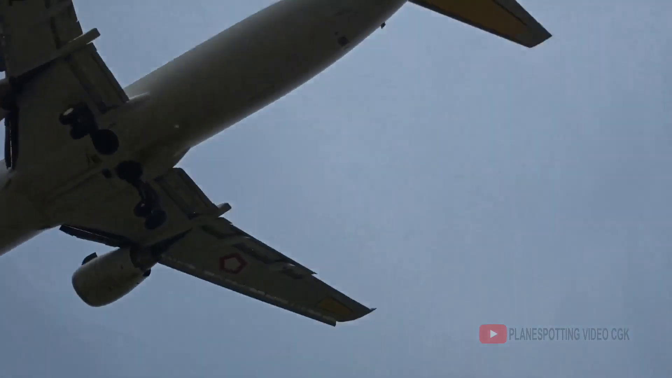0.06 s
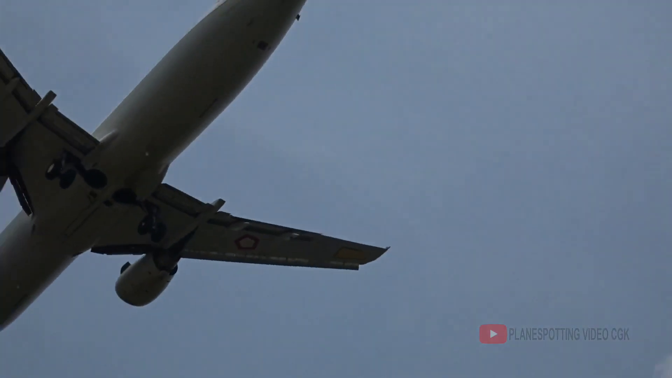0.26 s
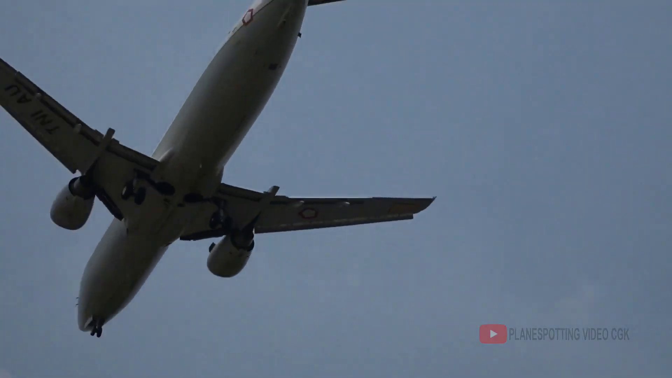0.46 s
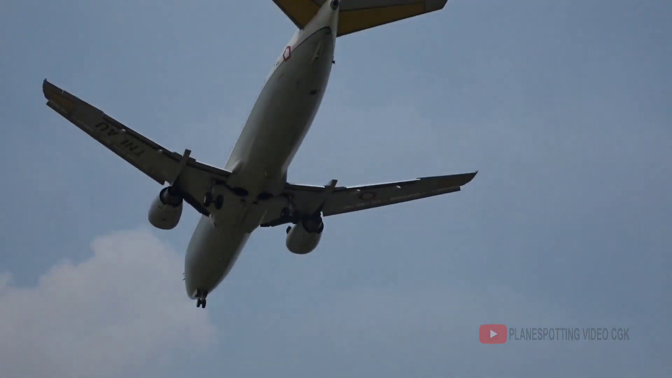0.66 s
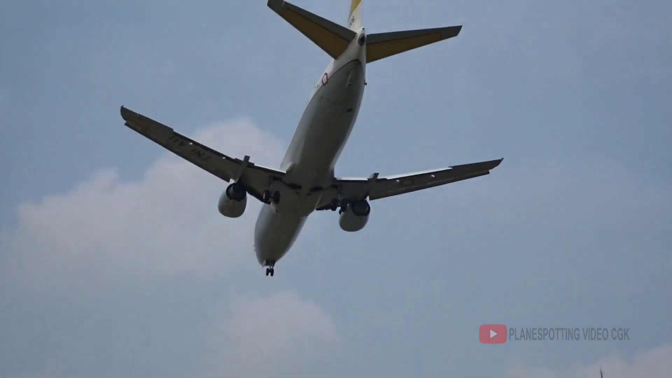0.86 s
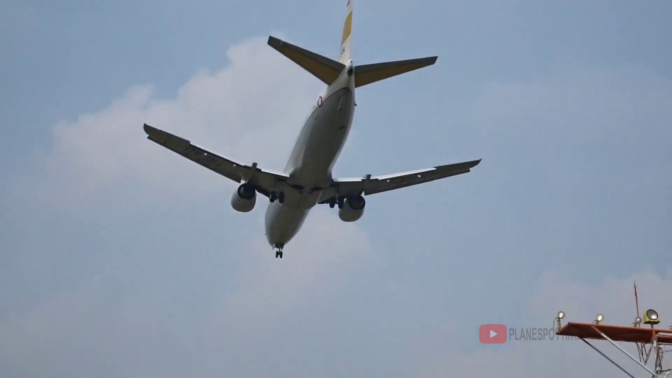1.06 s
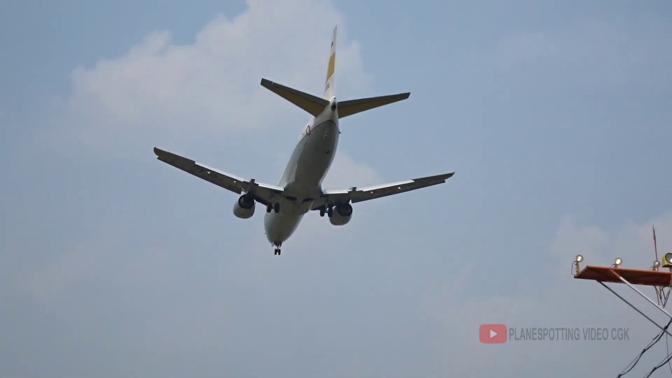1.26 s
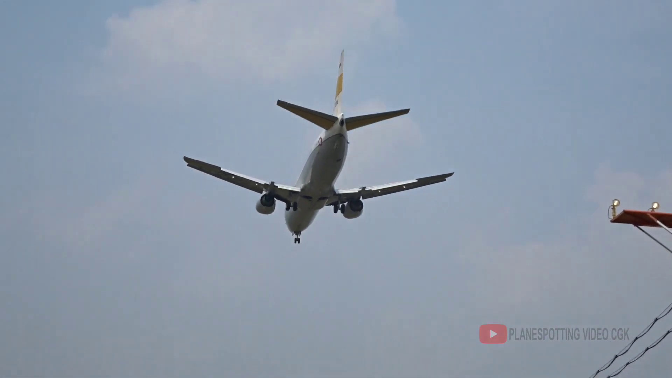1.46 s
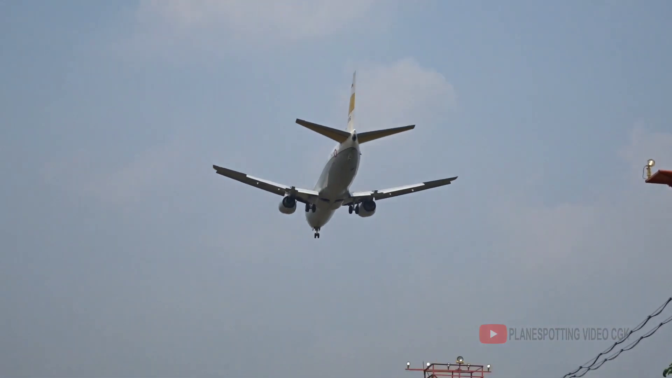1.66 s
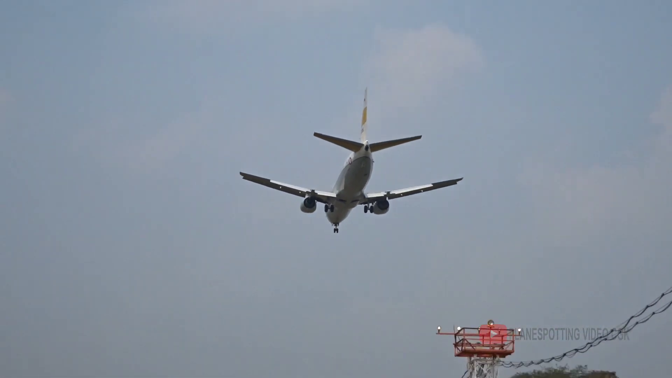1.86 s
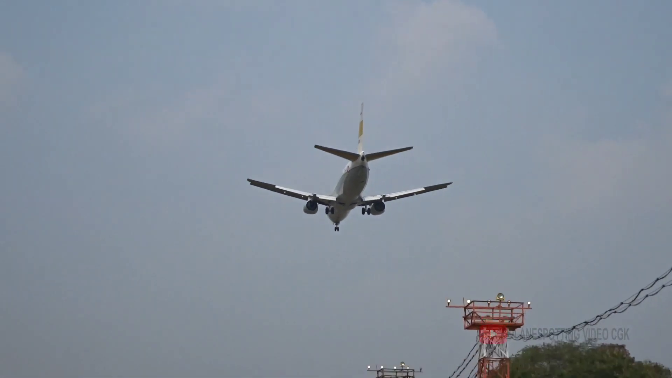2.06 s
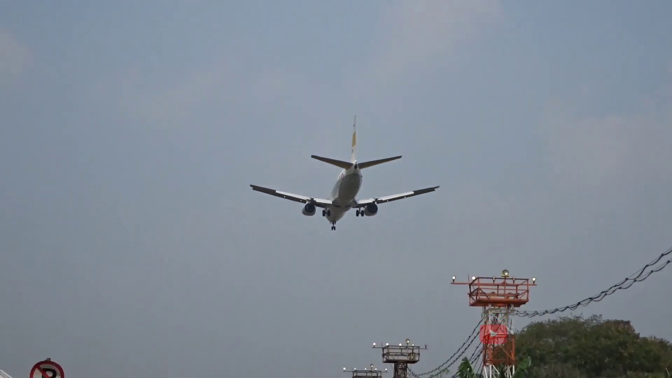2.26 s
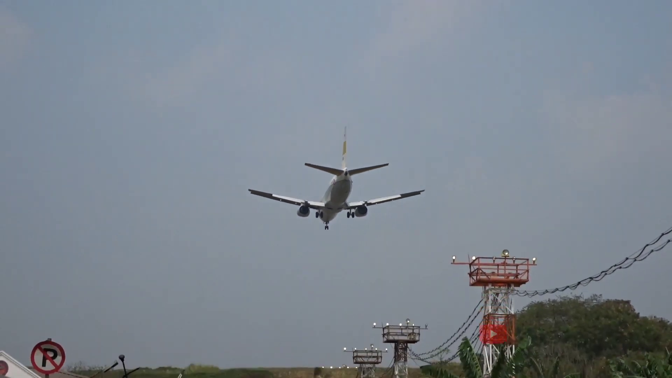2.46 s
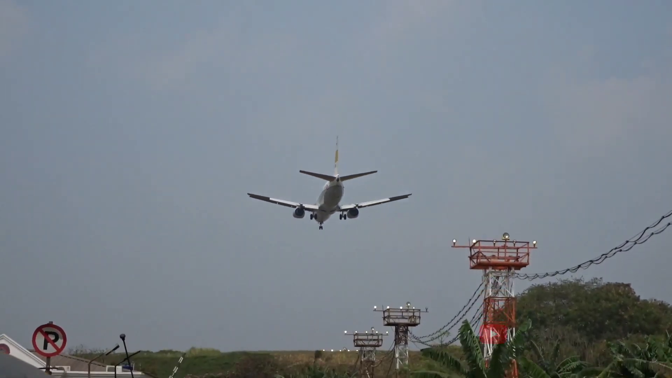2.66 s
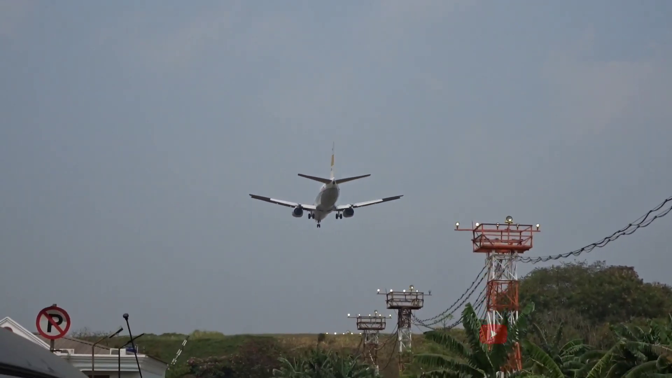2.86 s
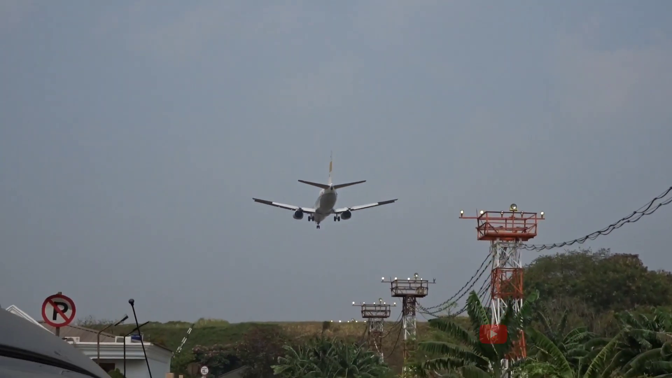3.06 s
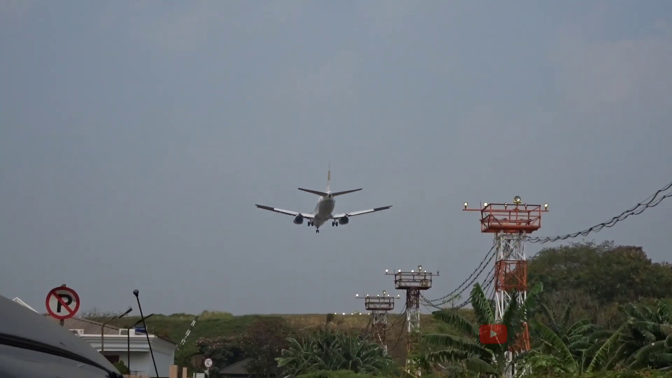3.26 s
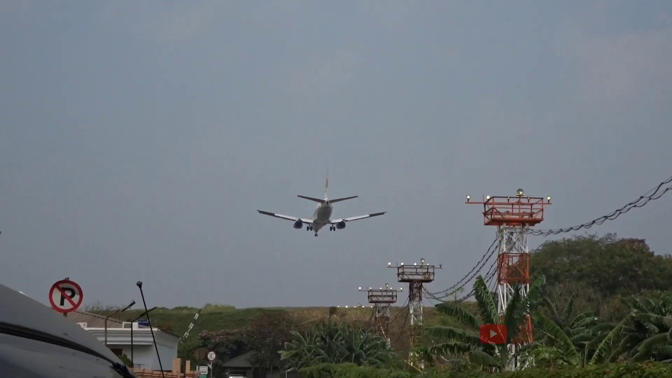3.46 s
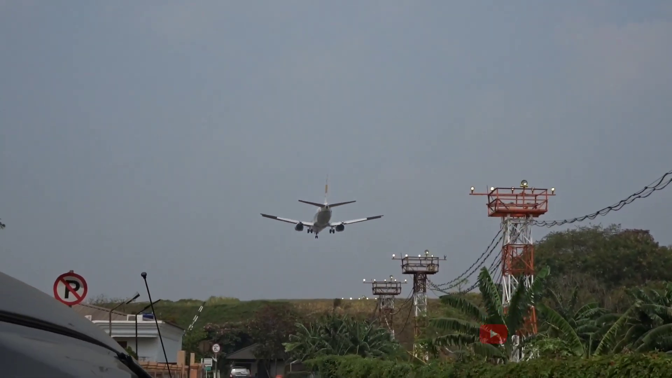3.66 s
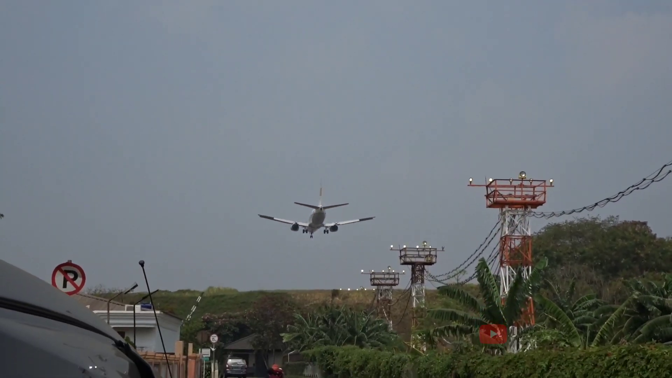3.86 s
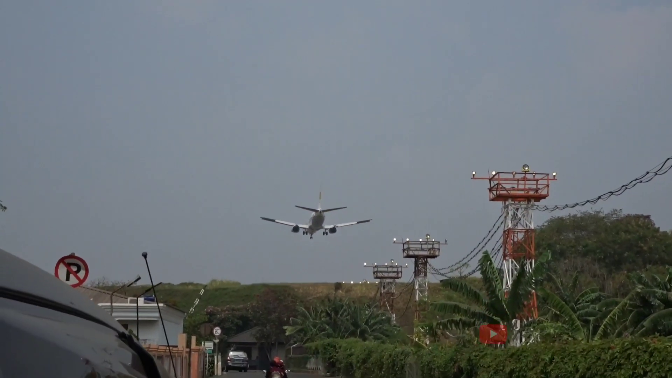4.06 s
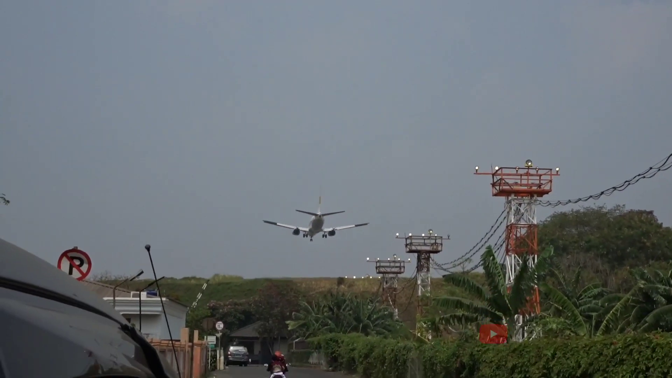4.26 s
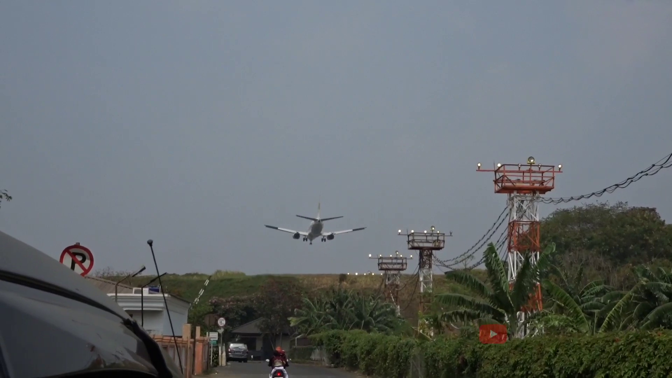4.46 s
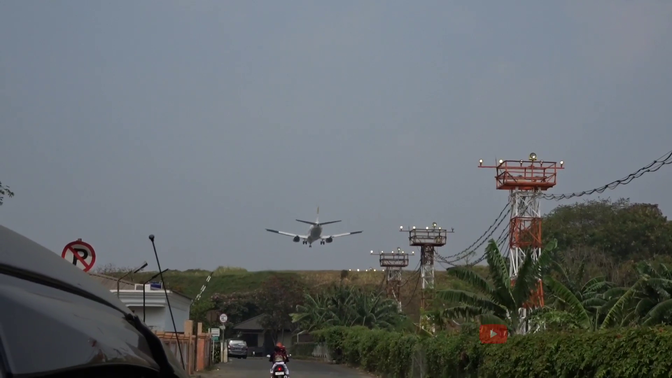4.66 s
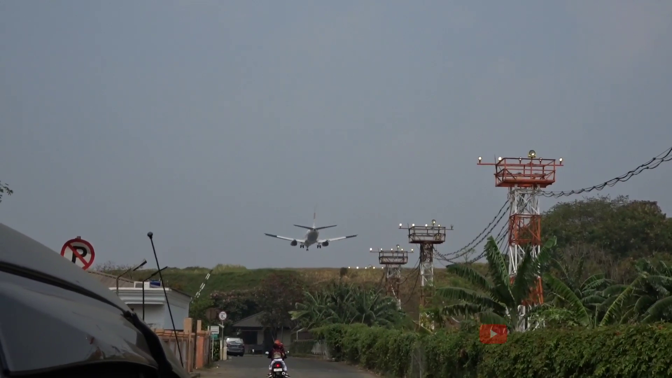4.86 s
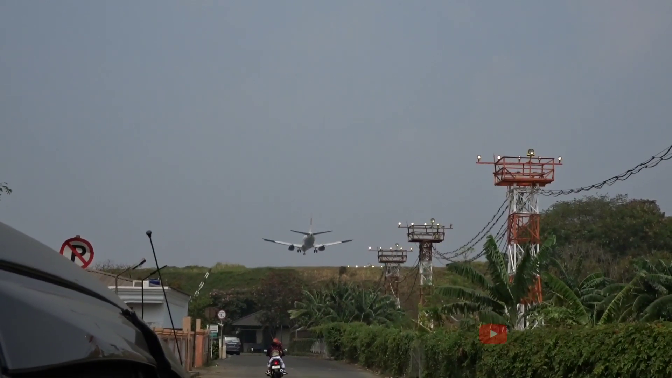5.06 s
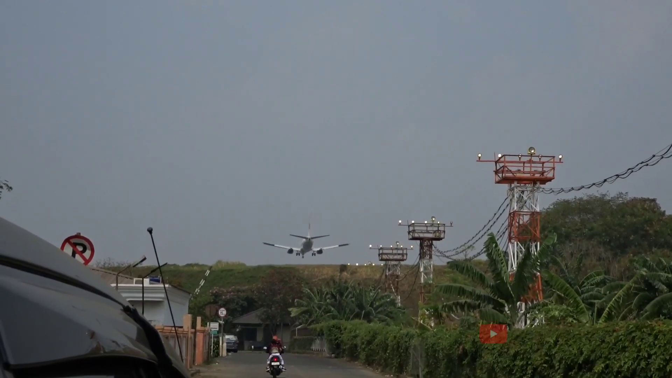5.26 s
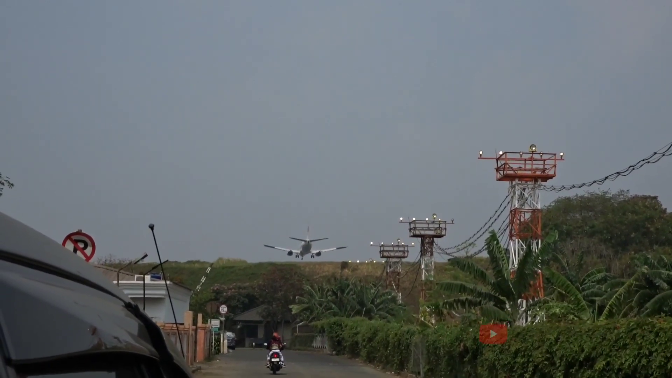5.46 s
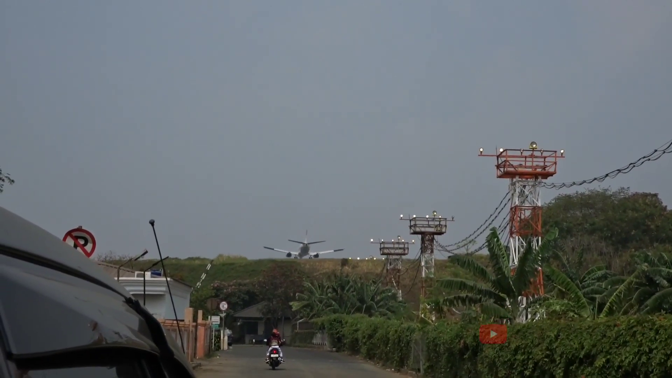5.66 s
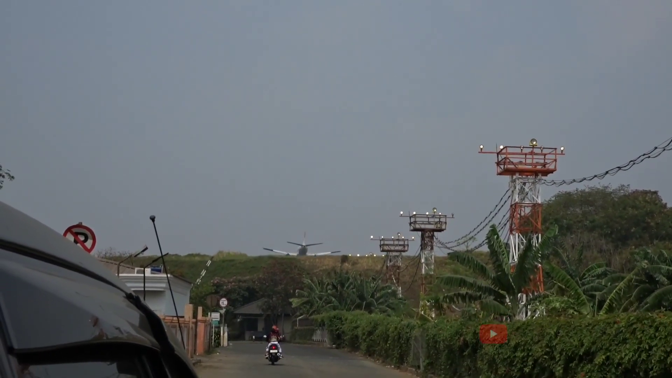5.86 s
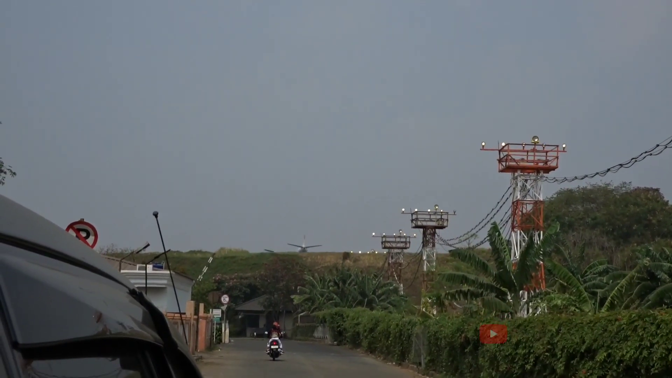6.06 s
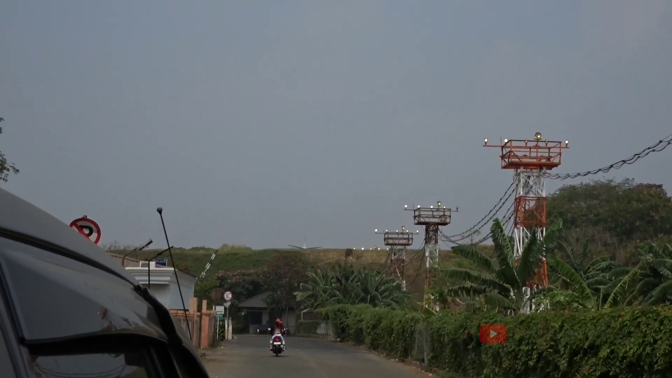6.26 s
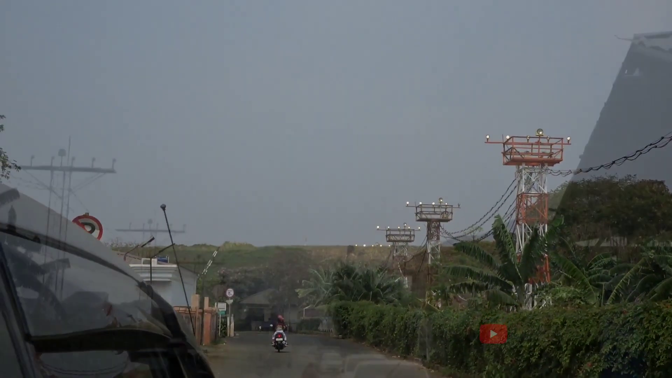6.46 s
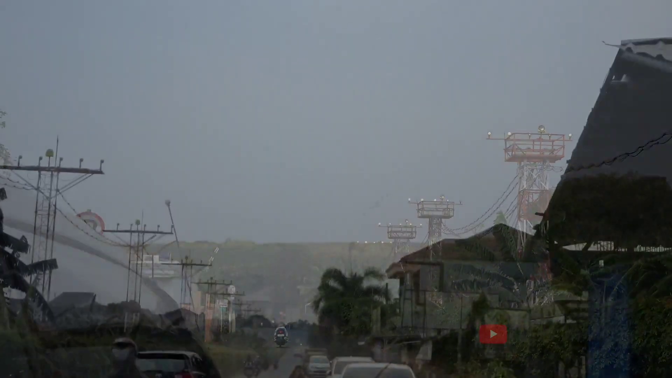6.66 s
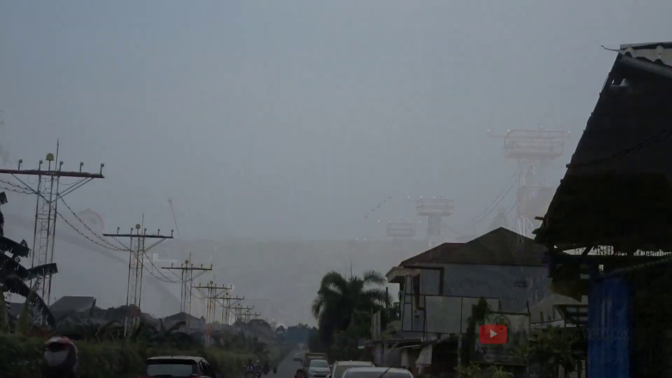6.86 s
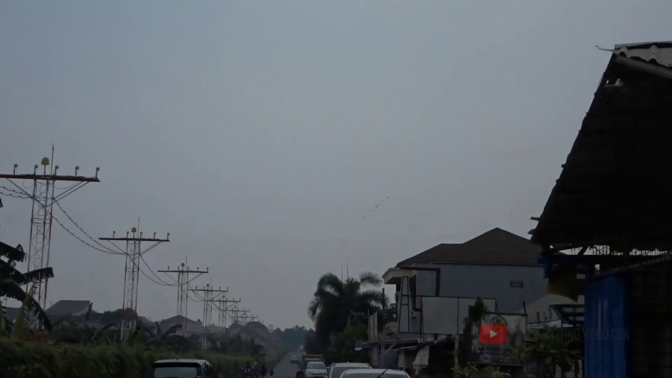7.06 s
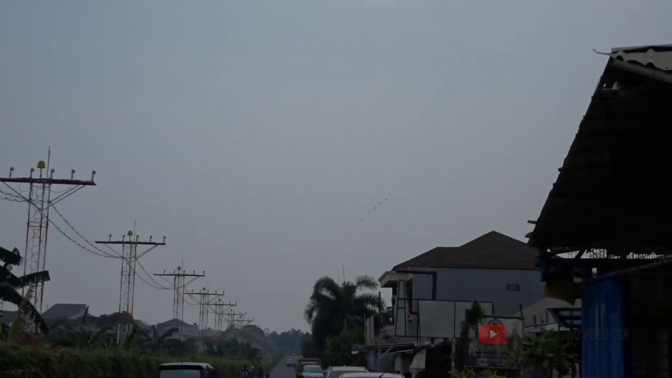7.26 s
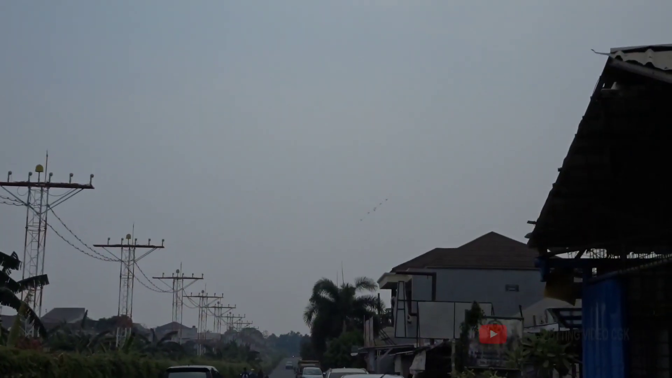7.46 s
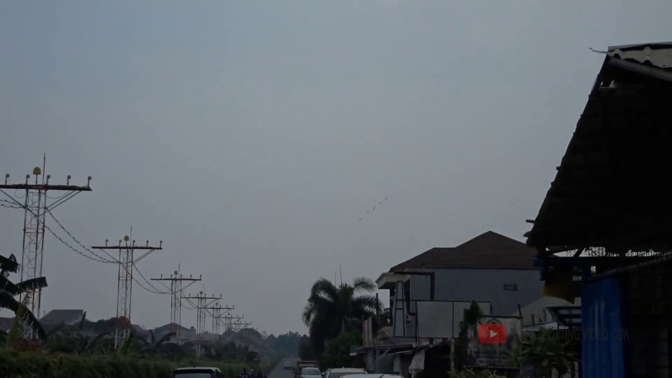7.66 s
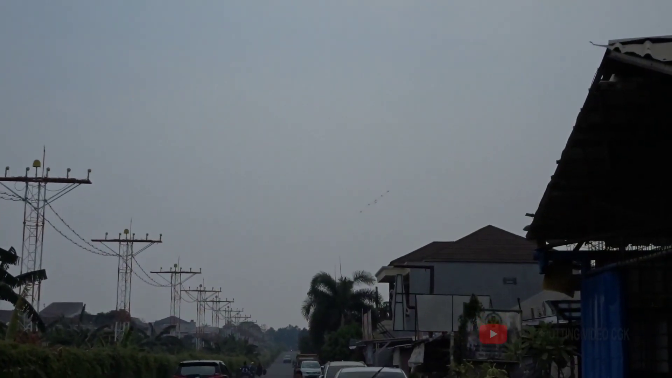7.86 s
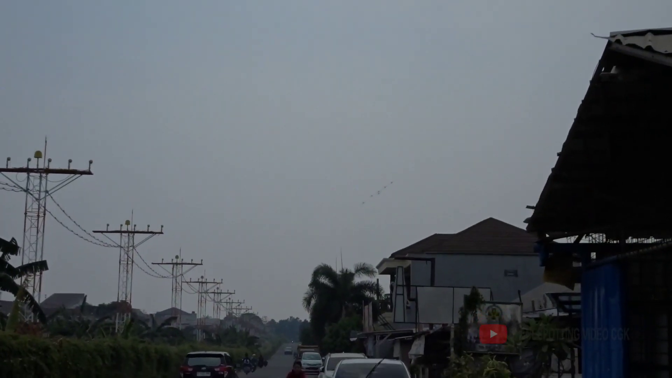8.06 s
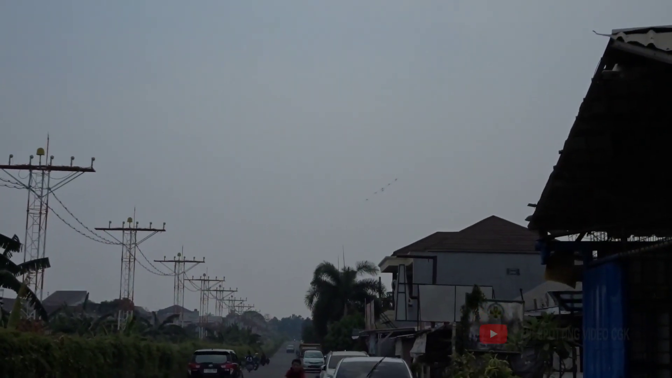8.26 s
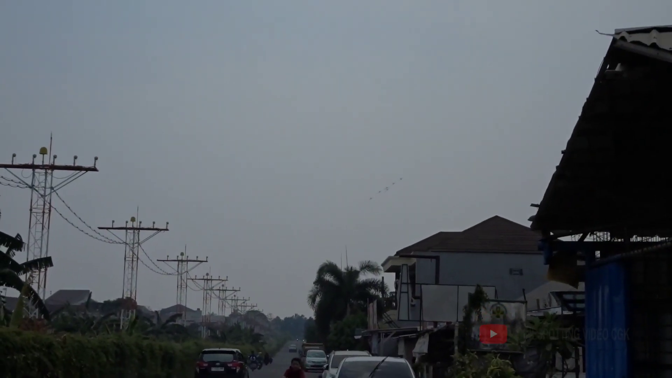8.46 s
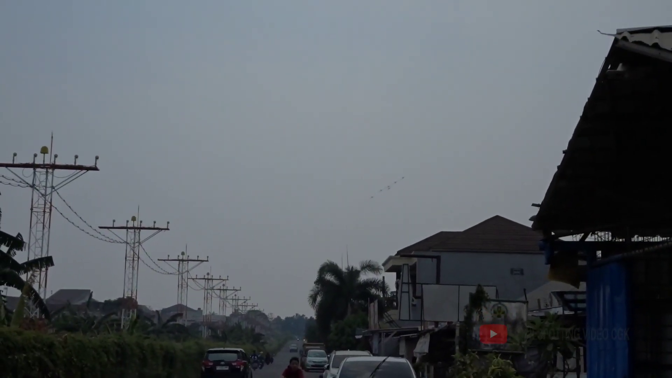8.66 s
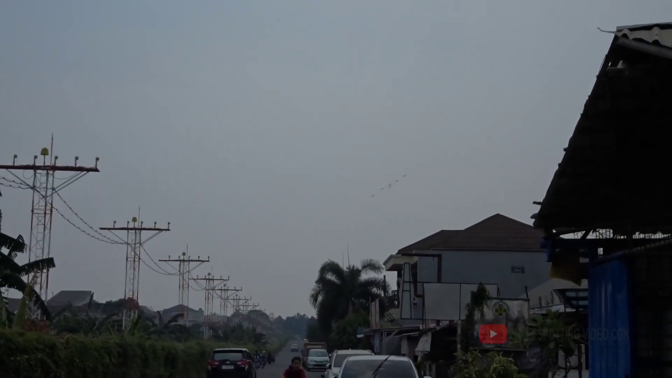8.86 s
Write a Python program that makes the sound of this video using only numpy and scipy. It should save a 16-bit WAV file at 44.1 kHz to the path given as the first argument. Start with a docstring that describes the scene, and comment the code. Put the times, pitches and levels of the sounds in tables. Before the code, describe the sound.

Outdoors by a road near a runway, a landing jet is already almost overhead: loud hissing roar and high blade whistles sliding down. A wavering engine whine near one kilohertz trails behind and fades over six seconds. Quiet street noise remains, with thin ticks; then a motorbike rushes past close to the stereo microphone and putters off, with two dry clicks near the end.

```python
"""Over steady street noise a jet airliner passes low overhead: filtered noise roars, dulled by distance,
and blade tones slide down in a turbulent skirt; a Doppler-shifted whine settles near 1 kHz, swelling and fading.
Thin ticks of bright noise follow. A motorbike rushes past, wheel after wheel, as comb-filtered tyre noise, with
grit and rough whirs, then putters away on exhaust puffs and engine orders; two sharp falling-pitch clicks
sound late. Low hums and buffets of air come and go."""
import sys
import numpy as np
from scipy import signal
from scipy.fft import rfft, irfft, next_fast_len
from scipy.io import wavfile
from scipy.ndimage import map_coordinates

SR = 44100
rng = np.random.default_rng(int(sys.argv[2]) if len(sys.argv) > 2 else 0)


def pcm_store(signal):
    """Save signal as 16-bit PCM."""
    levels = np.round(np.clip(np.atleast_2d(signal), -1, 1) * 32767)
    wavfile.write(sys.argv[1], SR, levels.astype(np.int16).T)


N = 393813
TIME = np.arange(N) / SR

# airliner: moment overhead, height over speed, speed over the speed of sound
OVERHEAD_S, HEIGHT_S, MACH = 0.2, 0.72, 0.19
# motorbike and its tailpipe: moment nearest, distance over speed
PASS_S, PASS_WIDTH_S = 7.57, 0.18
TAILPIPE_S, TAILPIPE_WIDTH_S = 7.78, 0.25

# Left-right likeness of airliner and street noise. Each row: frequency in Hz, correlation.
JET_LIKENESS = [(60, 0.93), (140, 1), (350, 0.97), (830, 0.98), (1990, 0.84), (4770, 0.74), (11400, 0.43)]
# Left-right likeness of motorbike noise. Each row: frequency in Hz, correlation.
BIKE_LIKENESS = [(100, 0.99), (600, 1), (1200, 0.85), (2000, 0.3), (3500, 0.31), (6000, 0.33), (11000, .15)]
# The engine slows once the bike is past. Each row: time in seconds, firings per second.
FIRING_RATE = [(6.6, 41.5), (7.3, 42.4), (7.55, 41), (8.15, 37.8), (8.93, 34.7)]


def amp(db):
    """Decibels to gain."""
    return 10 ** (np.asarray(db) / 20)


def unit(x):
    """Scale to rms 1."""
    return x / np.sqrt(np.mean(x ** 2) + 1e-20)


def along(points, hz):
    """(Hz, value) points read on a log frequency axis."""
    f, v = np.transpose(points)
    return np.interp(np.log(hz + 1), np.log(f + 1), v)


def curves(rows, t=TIME):
    """Each column after the time, read at the times t."""
    s, *cols = np.transpose(rows)
    return [np.interp(t, s, c) for c in cols]


def wobble(rate):
    """A smooth random curve of rms 1, rate knots per second."""
    coarse_s = TIME[::4]
    knots = rng.standard_normal(int(N * rate / SR) + 4)
    return unit(np.interp(TIME, coarse_s, map_coordinates(knots, [coarse_s * rate])))


def bump(x, centre, width):
    """A bell of height 1 around centre, down to exp(-2) at width from it."""
    return np.exp(-2 * ((x - centre) / width) ** 2)


def panned(x, side_db):
    """Make the left channel side_db louder than the right."""
    return x * amp([side_db / 2, -side_db / 2])


def filtered(x, response):
    """x times a response of frequency."""
    size = next_fast_len(N + SR // 2)
    hz = np.fft.rfftfreq(size, 1 / SR)
    return irfft(rfft(x, size) * response(hz), size)[..., :N]


def recoloured(x, gain_db, size=1024):
    """x through a filter that changes with time: gain_db(Hz, s)."""
    hz, t, z = signal.stft(x, SR, nperseg=size)
    return signal.istft(z * amp(gain_db(hz[:, None], t)), SR, nperseg=size)[1][..., :N]


def patches(hz, t, width_hz, length_s):
    """A random field of rms 1 over frequency and time: turbulence swells each band by itself."""
    rows, columns = np.broadcast_arrays(hz / max(width_hz, 40), t / max(length_s, .03))
    return unit(map_coordinates(rng.standard_normal((560, 310)), [rows, columns]))


def rush(spectrum, alike):
    """Stereo noise of rms 1 with a given spectrum and left-right likeness."""
    def mid_side(hz):
        turn = np.arccos(np.clip(along(alike, hz), 0, 1)) / 2
        return amp(along(spectrum, hz)) * [np.cos(turn), np.sin(turn)]

    mid, side = filtered(rng.standard_normal((2, N)), mid_side)
    return unit(np.array([mid + side, mid - side]))


def tone(pitch_hz, blur, blur_rate):
    """A line of about rms 1; the share blur of its power is scattered by turbulence."""
    phase = 2 * np.pi * np.cumsum(pitch_hz) / SR
    blur = np.clip(blur, 0, 1)
    scattered = wobble(blur_rate) * np.sin(phase) + wobble(blur_rate) * np.cos(phase)
    return np.sqrt(2 * (1 - blur)) * np.sin(phase) + np.sqrt(blur) * scattered


def passage(t, nearest_s, width_s):
    """A straight pass: distance in units of the nearest one, and angle past that point (radians)."""
    travelled = (t - nearest_s) / width_s
    return np.hypot(1, travelled), np.arctan(travelled)


def flight(t=TIME):
    """Relative distance and angle of the airliner."""
    return passage(t, OVERHEAD_S, HEIGHT_S)


def doppler(width_s=HEIGHT_S):
    """Pitch heard over pitch sent, as the airliner turns from coming to going."""
    return 1 / (1 + MACH * np.sin(passage(TIME, OVERHEAD_S, width_s)[1]))


def street_noise(level_db=-43):
    """Nearly steady broadband noise of the street."""
    # Each row: frequency in Hz, relative spectral level in dB.
    street_spectrum = [(20, -28), (70, -17), (150, -3.5), (500, 0.5), (1500, -2.5), (4000, -26),
                       (7000, -21.5), (11000, -27)]
    return amp(level_db + 0.42 * wobble(1.71)) * rush(street_spectrum, JET_LIKENESS)


def jet_level(layer, lobe_deg=39.8, lobe_width_deg=20, low_s=4.1):
    """dB of a layer: swells in the exhaust lobe behind the vertical, falls with distance, drifts once low."""
    # Each layer: base level in dB, loss in dB per doubling of distance, lift in dB in the exhaust lobe,
    # fade in dB per second after low_s (negative rises).
    jet_layers = {"boom": (-47, -0.3, 4.5, 0), "rumble": (-35.5, 2.5, 3.5, -0.8),
                  "roar": (-20.5, 3, 0.2, -0.1), "hiss": (-15.5, 3.5, 2, 1.5)}
    level_db, loss_db, lobe_db, fade_db = jet_layers[layer]
    r, angle = flight()
    lobe = bump(np.degrees(angle), lobe_deg, lobe_width_deg)
    return level_db - loss_db * np.log2(r) + lobe_db * lobe - fade_db * np.maximum(TIME - low_s, 0)


def jet_noise(air_db=6.0, scatter_hz=1400, patchy_db=1.24, gust_db=0.35):
    """Jet mixing and airframe noise, dulled by the air and combed by the echo off the ground."""
    # Four spectra. Each row: frequency in Hz, relative spectral level in dB.
    boom_spectrum = [(20, -34), (45, -26), (75, -11.5), (125, -1), (180, 3.5), (260, 6.5), (450, -35),
                     (900, -59)]
    rumble_spectrum = [(60, -38), (150, -22), (230, -5), (330, 4.5), (450, 3.5), (700, -21), (1500, -42)]
    roar_spectrum = [(200, -46), (420, -5.5), (550, -3.5), (680, -4), (850, 0.5), (1100, -1.5),
                     (1500, -7.5), (1900, -14.5), (2800, -18), (6000, -39)]
    hiss_spectrum = [(60, -38), (500, -44), (1200, 3), (1900, 2.5), (2500, 1), (3200, 0.5), (3700, 0.5),
                     (4600, 0), (5500, -0.5), (7000, 2.5), (8200, -0.2), (9500, 0.5), (11000, -0.5)]
    # Humps of the roar heard from behind. Each row: centre in Hz, width in Hz, full lift in dB.
    hump_rows = [(453, 154, -8), (817, 135, -5), (1080, 380, -0.5), (1256, 150, -4.5), (1480, 160, 0),
                 (1820, 250, -2.5), (2110, 100, -3), (3030, 260, 0.5), (3500, 220, -1), (3800, 170, -0.5),
                 (4060, 290, 0.5), (5980, 250, -0.5)]
    # A hollow resonance wanders. Each row: time in seconds, centre in Hz, lift in dB.
    hollow_path = [(0, 627, 1.5), (1.3, 685, 2), (1.9, 650, 3.5), (2.5, 585, 5.5), (3.2, 647, 8.5),
                   (3.8, 690, 7), (4.4, 700, 3), (5.3, 664, 3), (6, 664, 0)]
    # The treble swells and ebbs. Each row: time in seconds, lift in dB at the centre.
    treble_swell = [(0.42, 0.5), (0.54, 2.6), (0.85, 2), (1.3, 3), (1.52, 0.6), (1.8, 0.4), (2.3, 3),
                    (3, 1.4), (4, -0.5)]
    hollow_width_hz, treble_hz, treble_octaves = 225, 4400, 1.12
    ground_share, ground_delay_s, steepest_s = 0.22, 0.0094, -0.04  # delay is longest at steepest_s

    gusts = gust_db * wobble(7)  # move roar and hiss together
    boom = amp(jet_level("boom") + 0.5 * wobble(8.2)) * rush(boom_spectrum, JET_LIKENESS)
    rumble = amp(jet_level("rumble") + 0.6 * wobble(12)) * rush(rumble_spectrum, JET_LIKENESS)
    roar = amp(jet_level("roar") + gusts + 0.38 * wobble(30)) * rush(roar_spectrum, JET_LIKENESS)
    hiss = amp(jet_level("hiss") + gusts + 0.43 * wobble(24.98)) * rush(hiss_spectrum, JET_LIKENESS)

    def path_db(hz, t):
        absorbed = air_db * flight(t)[0] * (hz / 10000) ** 2.47
        echo = ground_share / (1 + (hz / scatter_hz) ** 4)  # rough ground scatters the treble
        delay_s = ground_delay_s / passage(t, steepest_s, HEIGHT_S)[0]  # shrinks toward the horizon
        comb = abs(1 + echo * np.exp(2j * np.pi * hz * delay_s))
        from_behind = np.interp(t, [.3, 2.6, 5.4, 6.5], [0.41, 1, 0.96, 1.0])
        humps = sum(db * bump(hz, centre, width) for centre, width, db in hump_rows)
        hollow_hz, hollow_db = curves(hollow_path, t)
        hollow = hollow_db * bump(hz, hollow_hz, hollow_width_hz)
        treble = curves(treble_swell, t)[0] * bump(np.log2((hz + 1) / treble_hz), 0, treble_octaves)
        turbulence = patchy_db * patches(hz, t, width_hz=70, length_s=.12)
        return 20 * np.log10(comb) - absorbed + from_behind * humps + hollow + treble + turbulence

    return recoloured(boom + rumble + roar + hiss, path_db, size=2048)


def whistles(off_beam_db=0.35, loss_db=7, blur_rate=620, glide_s=.88, skirt_db=-5, skirt_rate=2000):
    """Blade tones in a turbulent skirt slide down overhead, losing off_beam_db per degree off their beam."""
    # Each row: pitch in Hz before the Doppler shift, level in dB on the beam before distance loss,
    # beam direction in degrees behind the vertical.
    blade_tones = [(7040, -22.5, -10.5), (7200, -31, 21), (7820, -26.5, 11), (7900, -41, 60)]
    r, angle = flight()
    shift = doppler(glide_s)

    def blade(pitch_hz):
        core = tone(pitch_hz, blur=0.88, blur_rate=blur_rate)
        skirt = tone(pitch_hz, blur=0.85, blur_rate=skirt_rate)
        return core + amp(skirt_db) * skirt

    sound = np.zeros((2, N))
    for hz, db, beam_deg in blade_tones:
        off_beam_deg = abs(np.degrees(angle) - beam_deg)
        level_db = db - off_beam_db * off_beam_deg - loss_db * np.log2(r)
        sound += amp(level_db) * np.array([blade(hz * shift) for _ in range(2)])  # scattered per channel
    return sound


def whine(sent_hz=1277.5, flicker_db=0.2, upper_db=-16, octave_db=-19.5):
    """The engine tone emerges behind the airliner, with its octave and an unrelated tone between them."""
    # The whine swells and fades, with brief deep dips. Each row: time in seconds, level in dB.
    whine_level = [(0.75, -33), (0.86, -35), (0.9, -30), (1.32, -28), (1.34, -51), (1.46, -29.5),
                   (1.48, -39), (1.6, -31), (1.78, -29), (1.8, -44), (2.01, -28), (2.13, -37), (2.2, -22.5),
                   (2.24, -34), (2.53, -25.0), (2.62, -37), (2.65, -28), (2.92, -24.5), (3.11, -38),
                   (3.14, -30), (3.26, -44), (3.37, -25), (3.46, -36.5), (3.57, -28.5), (3.64, -36),
                   (3.72, -31.5), (3.95, -36.5), (4.01, -28), (4.04, -38), (4.12, -27.5), (4.24, -31),
                   (4.63, -19.5), (4.83, -32.5), (5.12, -27), (5.16, -53), (5.24, -31), (5.46, -28),
                   (5.64, -39.5), (5.78, -36), (6.16, -41.5), (6.19, -41), (6.36, -43), (6.41, -33),
                   (6.74, -41), (6.84, -38), (6.89, -38)]
    pitch_hz = sent_hz * doppler()
    line_db, = curves(whine_level)
    hiss_db = jet_level("hiss")
    emerging = amp(np.interp(TIME, [.4, .75], [-30, 0]))
    line = tone(pitch_hz + 0.98 * wobble(14), blur=0.17, blur_rate=70)
    main = amp(line_db + flicker_db * wobble(9.2)) * line
    upper = amp(hiss_db + upper_db) * tone(pitch_hz * 1.388, blur=0.93, blur_rate=60)
    octave = amp(hiss_db + octave_db) * tone(2 * pitch_hz, blur=0.99, blur_rate=66)
    overtones = (upper + octave) * np.interp(TIME, [.6, 1.1, 3.5, 6], [0.69, 0.9, 0.82, 0.12])
    return emerging * (main + overtones)


def airliner(noise_fade_s=6.4, whine_fade_s=6.7, fade_db_per_s=20):
    """All sounds of the airliner, dying away at the end; the whine outlasts the roar."""
    # Stereo balance. Each row: frequency in Hz, left minus right in dB.
    side_balance = [(60, 0), (500, -0.4), (1400, -1), (4000, -2.5), (8000, -1.5), (11000, -1.5)]

    def fade(start_s):
        return amp(-fade_db_per_s * np.maximum(TIME - start_s, 0))

    sound = (jet_noise() + whistles()) * fade(noise_fade_s) + whine() * fade(whine_fade_s)
    return filtered(sound, lambda hz: panned(0.99, along(side_balance, hz)))


def draught():
    """The air dragged along by the airliner and the bike buffets the ear as low noise."""
    # Each row: centre in seconds, half-length in seconds, level in dB.
    buffet_rows = [(.47, 0.13, -50), (7.45, .25, -61), (7.87, .08, -58)]
    swell = sum(amp(db) * bump(TIME, s, length) for s, length, db in buffet_rows)
    return swell * rush([(20, -4), (50, -5), (100, 15), (300, -38), (900, -86)], [(50, 1.0)])


def ticks(life_s=0.0025, low_hz=4000):
    """Tiny high-passed noise bursts, decaying within a few milliseconds."""
    # Each row: start in seconds, level in dB before the common gain and filter.
    tick_rows = [(5.809, -37), (6.753, -27), (7.204, -19), (7.408, -18)]
    envelope = sum(amp(db) * (TIME >= s) * np.exp(-abs(TIME - s) / life_s) for s, db in tick_rows)
    noise = envelope * rng.standard_normal((2, N)) * 0.88
    return filtered(noise, lambda hz: hz ** 3 / (hz ** 3 + low_hz ** 3))


def fizz(level_db=-60):
    """A faint high noise swells and fades ahead of the bike."""
    ahead = bump(TIME, 6.5, 1.1)
    return amp(level_db) * ahead * rush([(2000, -21), (6000, -5), (11000, 8), (13000, -37)], [(6000, .1)])


def hums():
    """Low hums of traffic: partly scattered tones that swell and fade."""
    # Each row: centre in seconds, half-length in seconds, pitch in Hz, level in dB.
    hum_rows = [(6.347, 0.56, 133.2, -52), (7.1, 0.3, 80.8, -60)]
    return sum(amp(db) * bump(TIME, s, length) * tone(np.full(N, hz), blur=0.39, blur_rate=16)
               for s, length, hz, db in hum_rows)


def bike_level(layer, nearest_s=PASS_S, width_s=PASS_WIDTH_S):
    """dB of a layer: falls with distance, and differs ahead of the bike and behind it."""
    # Each layer: base level in dB at the nearest point, loss in dB per doubling of distance,
    # lift in dB from behind (the opposite from ahead).
    bike_layers = {"tyres": (-16.5, 13.3, 0), "exhaust": (-26.5, 4.66, 6.5), "note": (-51.5, 1.3, 4.4),
                   "drone": (-44.5, 10, -5.5), "grit": (-42, 11, -2)}
    level_db, loss_db, behind_db = bike_layers[layer]
    r, angle = passage(TIME, nearest_s, width_s)
    return level_db - loss_db * np.log2(r) + behind_db * np.sin(angle)


def wheel(nearest_s, width_s, echo_share=0.4, spacing_hz=716, scatter_hz=1150, turn_s=0.083):
    """One tyre's rush combed by its echo off the road: the comb sinks as it nears and rises as it leaves."""
    # Each row: frequency in Hz, relative spectral level in dB.
    tyre_spectrum = [(120, -34), (220, -17), (340, -8), (500, -5.5), (720, 0.7), (1000, 0.5), (1400, 1),
                     (2200, -2.5), (3200, -3.5), (4500, -11.5), (5600, -17.5), (7500, -20), (9500, -25.5),
                     (11000, -36)]
    # A band sweeps up as the bike goes by. Each row: time in seconds, centre in Hz, lift in dB.
    band_sweep = [(7.3, 1210, -5), (7.41, 1160, -4), (7.47, 1080, 4.5), (7.54, 1410, 1.5),
                  (7.62, 1440, 3.5), (7.72, 1800, 9), (7.8, 2050, 13), (7.86, 2260, 11), (7.88, 2430, -17)]

    def colour_db(hz, t):
        comb_hz = spacing_hz * passage(t, nearest_s, turn_s)[0]
        echo = echo_share / (1 + (hz / scatter_hz) ** 2)
        comb = abs(1 + echo * np.exp(2j * np.pi * hz / comb_hz))
        centre_hz, lift_db = curves(band_sweep, t)
        return 20 * np.log10(comb) + lift_db * bump(hz, centre_hz, 0.3 * centre_hz)

    level_db = bike_level("tyres", nearest_s, width_s) + 0.59 * wobble(18)
    return recoloured(amp(level_db) * rush(tyre_spectrum, BIKE_LIKENESS), colour_db)


def grit(grains_per_s=900, scatter_db=4):
    """Sand crackles under the tyres: random impulses of uneven size, filtered."""
    # Each row: frequency in Hz, filter gain in dB.
    grit_spectrum = [(500, -24), (2000, -6), (3300, -12), (4500, -4), (6000, 0), (11000, -15)]
    hits = rng.random(N) < grains_per_s / SR
    grains = hits * rng.choice([-1, 1], (2, N)) * amp(scatter_db * rng.standard_normal(N))
    return amp(bike_level("grit")) * unit(filtered(grains, lambda hz: amp(along(grit_spectrum, hz))))


def engine_note(phase, waver_db=0.6):
    """Even orders drone ahead of the bike; the tailpipe sends a dense stack of orders backwards."""
    # Even orders heard from the front. Each row: frequency in Hz, gain in dB.
    drone_gain = [(84, -14), (168, 0), (252, 3), (336, -10), (500, -26)]
    # Orders favoured by the exhaust pipe. Each row: frequency in Hz, gain in dB.
    pipe_gain = [(72, -12), (110, -0.5), (150, 1), (220, -0.5), (290, 2), (350, -2), (420, 3), (520, -14),
                 (720, -4), (950, -9)]
    firing_hz, = curves(FIRING_RATE)
    front = amp(bike_level("drone"))
    rear = amp(bike_level("note", TAILPIPE_S, TAILPIPE_WIDTH_S))
    note = np.zeros(N)
    for order in range(2, 25):
        hz = order * firing_hz
        drone = front * amp(along(drone_gain, hz)) if order % 2 == 0 else 0
        strength = np.hypot(drone, rear * amp(along(pipe_gain, hz)))
        waver = amp(waver_db * wobble(2.7))
        note += strength * waver * np.cos(order * phase + rng.uniform(0, 2 * np.pi))
    return np.interp(TIME, [6.9, 7.3], [0, 1]) * note


def exhaust_puffs(phase, puff_depth=0.059):
    """Exhaust noise, loudest after the tailpipe passes, with one gentle puff per firing."""
    # Each row: frequency in Hz, relative spectral level in dB.
    exhaust_spectrum = [(60, -35), (150, -18), (300, -6), (470, -3.5), (720, 2), (1100, -3.5), (1400, 1),
                        (1900, 1.7), (2500, -3.5), (3400, -12), (4400, -9.5), (5800, -25.5), (7200, -27.5),
                        (11000, -53)]
    puffs = unit(np.exp(puff_depth * np.cos(phase)))
    level_db = bike_level("exhaust", TAILPIPE_S, TAILPIPE_WIDTH_S)
    return amp(level_db) * puffs * rush(exhaust_spectrum, BIKE_LIKENESS)


def motorbike(lag_s=0.00012, patchy_db=1.2):
    """Tyre rush and grit on the way past, then exhaust puffs over the engine note."""
    # The wheels pass in turn. Each row: moment nearest in seconds, distance over speed in seconds,
    # gain in dB on the tyre level.
    wheel_rows = [(7.362, 0.26, -1), (7.625, 0.16, -3)]
    # Each row: time in seconds, left minus right in dB.
    pan_path = [(6.7, -3), (7.2, -4), (7.5, -2.5), (7.75, -1), (8.1, -2), (8.9, -2)]
    firing_hz, = curves(FIRING_RATE)
    phase = 2 * np.pi * np.cumsum(firing_hz) / SR + 0.031 * wobble(16)  # slightly uneven firings
    tyres = sum(amp(db) * wheel(s, width) for s, width, db in wheel_rows)
    noise = recoloured(tyres + exhaust_puffs(phase),
                       lambda hz, t: patchy_db * patches(hz, t, width_hz=120, length_s=.09))
    left, right = panned(noise + grit() + engine_note(phase), curves(pan_path)[0])
    lag = np.interp(TIME, [5.7, 8.8], [0, lag_s])  # the bearing shifts: the right channel falls behind
    return np.array([left, map_coordinates(right, [(TIME - lag) * SR])])


def whir():
    """Rough notes, fully scattered tones, swell and fade as the bike goes by."""
    # Each row: centre in seconds, half-length in seconds, pitch in Hz, level in dB, flutters per second.
    whir_rows = [(7.08, 0.39, 1336, -31.5, 220), (7.08, 0.31, 560, -39, 54), (7.168, 0.11, 660, -32, 70),
                 (7.34, 0.09, 590, -29, 80), (7.27, 0.43, 361, -44, 45), (8.7, 0.45, 1192, -44.5, 25)]
    return sum(amp(db) * bump(TIME, s, length) * tone(np.full(N, hz), blur=1.0, blur_rate=rate)
               for s, length, hz, db, rate in whir_rows)


def click(fall_s=.000145, life_s=.0007):
    """Dry snaps: decaying sines whose pitch collapses within a millisecond."""
    # Each row: start in seconds, gain in dB on the snap.
    click_rows = [(7.8755, 0.3), (8.79636, .8)]
    # One row per channel: delay in seconds, signed strength before decay and filter,
    # starting pitch in Hz, ending pitch in Hz.
    snap_shape = [(0, -.62, 4900, 800), (.00004, .35, 3200, 560)]
    delay_s, peak, start_hz, end_hz = np.transpose(snap_shape)[..., None]
    sound = np.zeros((2, N))
    for s, db in click_rows:
        t = np.maximum(TIME - s - delay_s, 0)
        cycles = end_hz * t + (start_hz - end_hz) * fall_s * (1 - np.exp(-t / fall_s))
        sound += amp(db) * peak * np.sin(2 * np.pi * cycles) * np.exp(-t / life_s)
    return filtered(sound, lambda hz: 1 / (1 + (hz / 7800) ** 6))


def nearby_echoes(x, share=0.22, reach_s=.03, count=12):
    """Weak copies off parked cars, fences and walls put a fine ripple on the treble."""
    walls = np.zeros((2, SR // 10))
    for channel in walls:
        delays = (rng.uniform(.1, 1, count) * min(reach_s, .09) * SR).astype(int)
        channel[delays] = rng.choice([-1, 1], count) / np.sqrt(count)
    echoes = signal.fftconvolve(x, walls, axes=1)[:, :N]
    return x + share * filtered(echoes, lambda hz: hz ** 2 / (hz ** 2 + 2000 ** 2))


def scene():
    """Airliner and motorbike with nearby echoes, over the street and its small sounds."""
    passing = nearby_echoes(airliner() + motorbike())
    background = street_noise() + hums()
    return passing + background + draught() + ticks() + fizz() + whir() + click()


def record(dry, top_hz=11120):
    """Band limit: nothing is kept from top_hz up."""
    return filtered(dry, lambda hz: hz < top_hz)


dry = scene()
out = record(dry)
pcm_store(out)
```